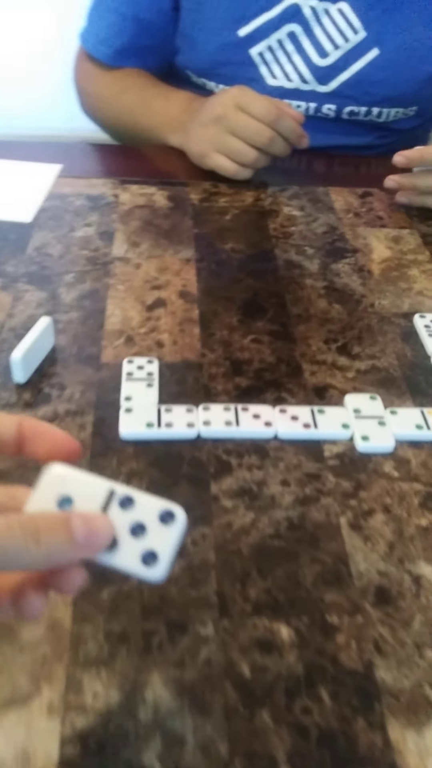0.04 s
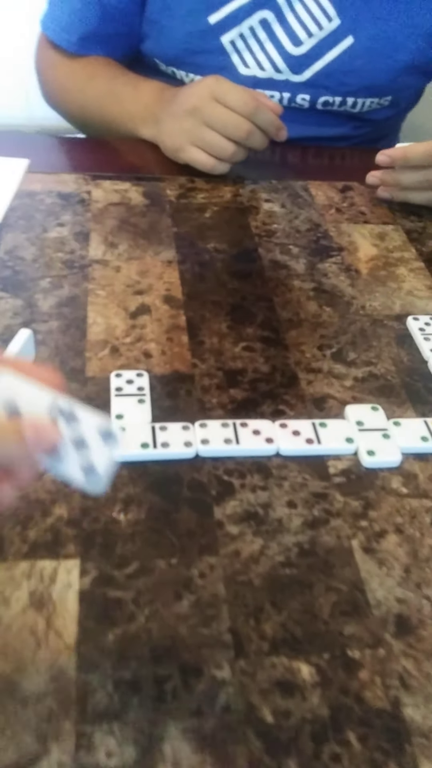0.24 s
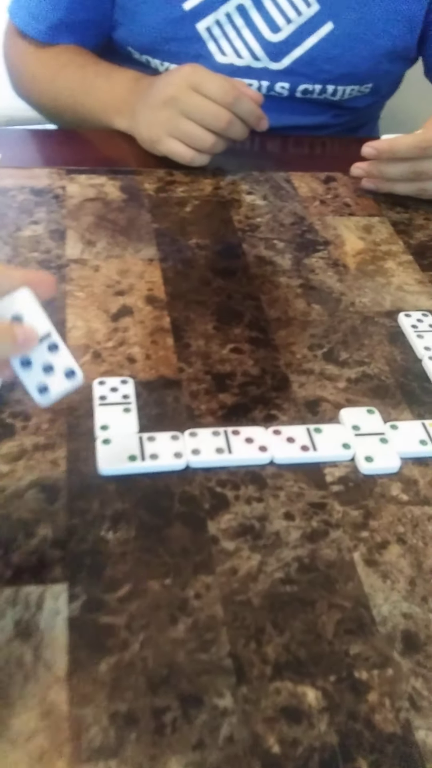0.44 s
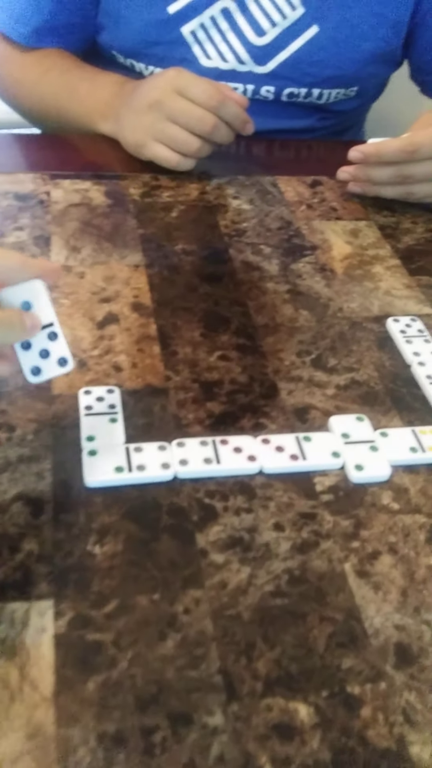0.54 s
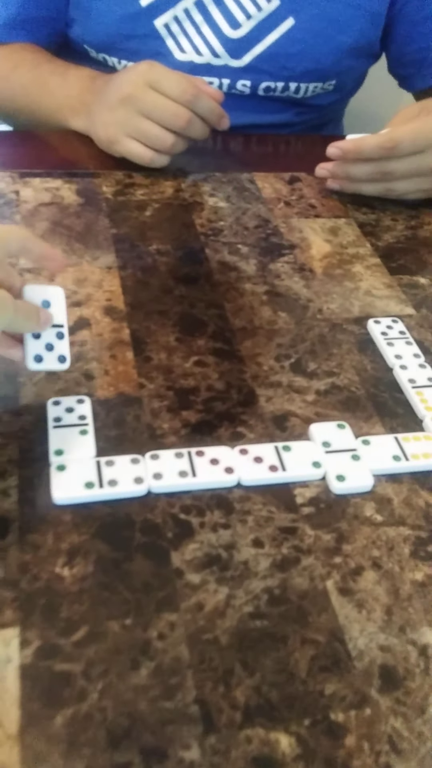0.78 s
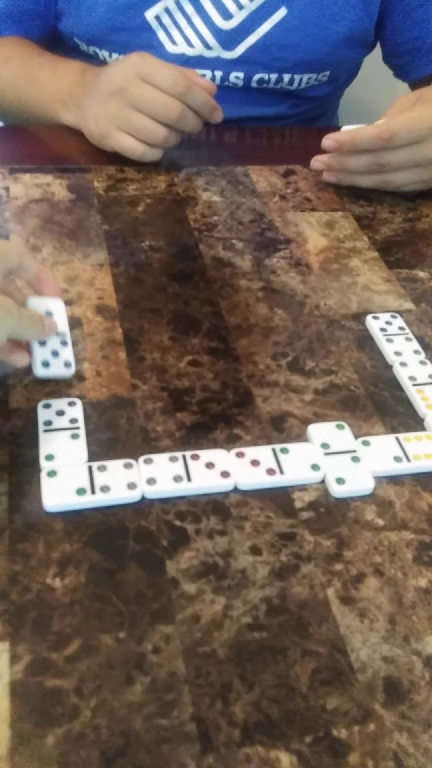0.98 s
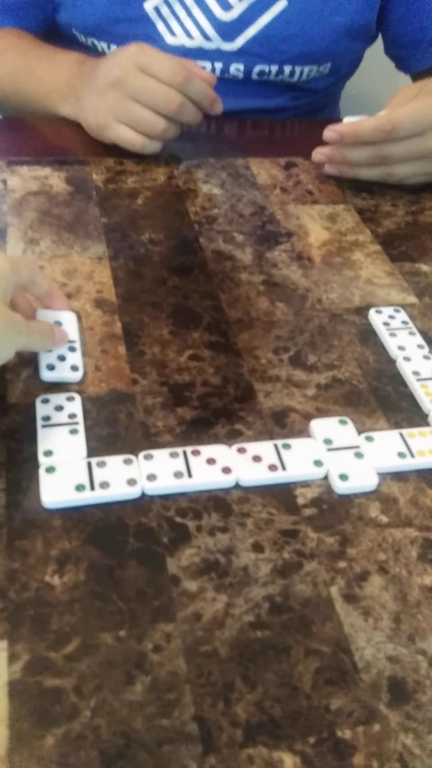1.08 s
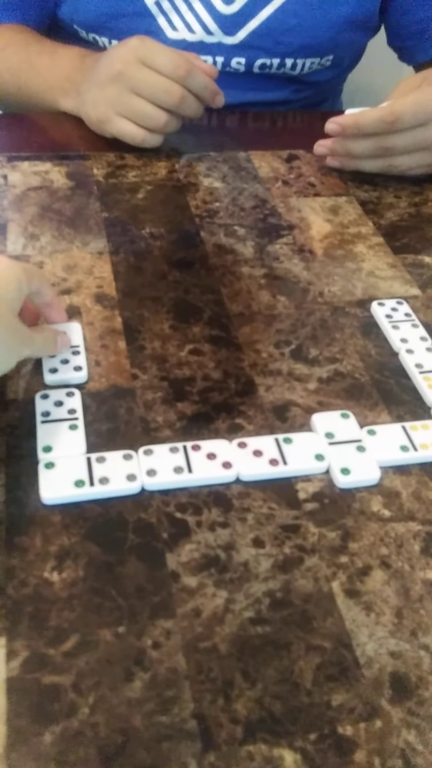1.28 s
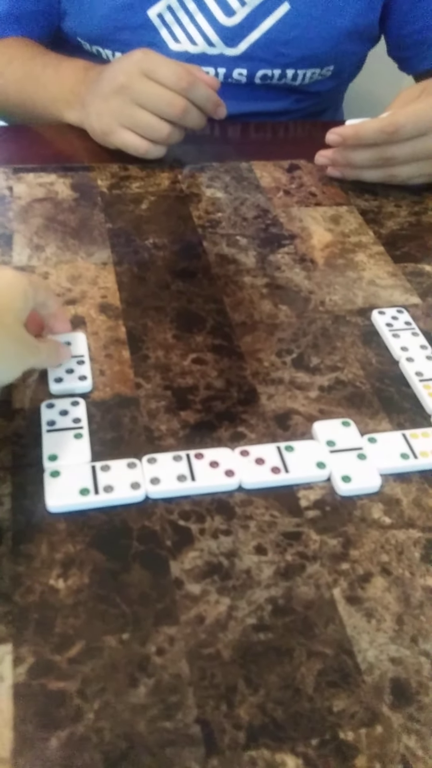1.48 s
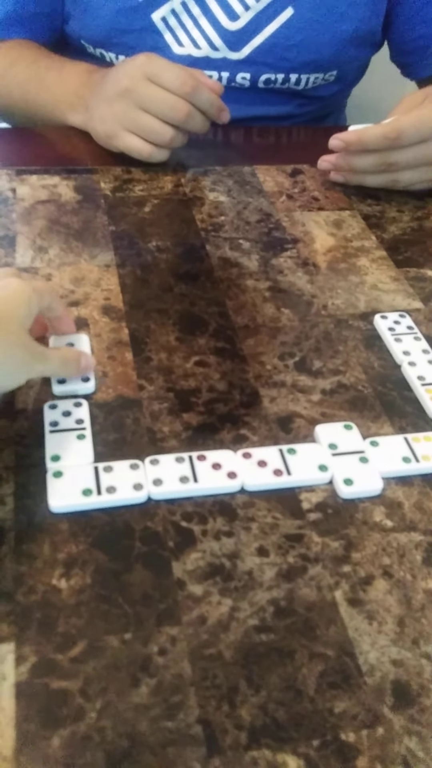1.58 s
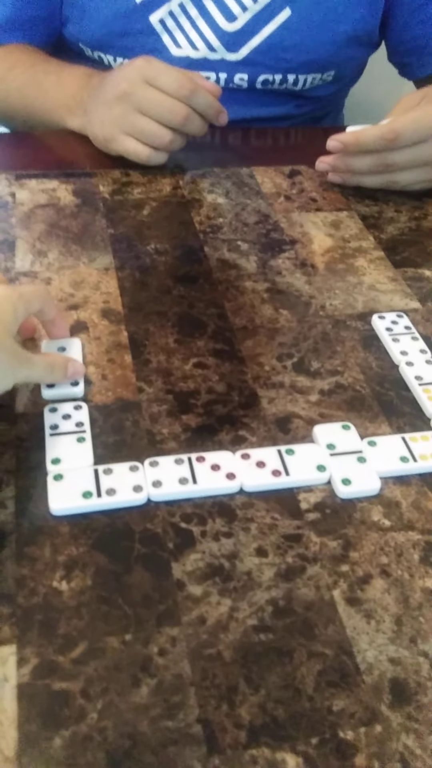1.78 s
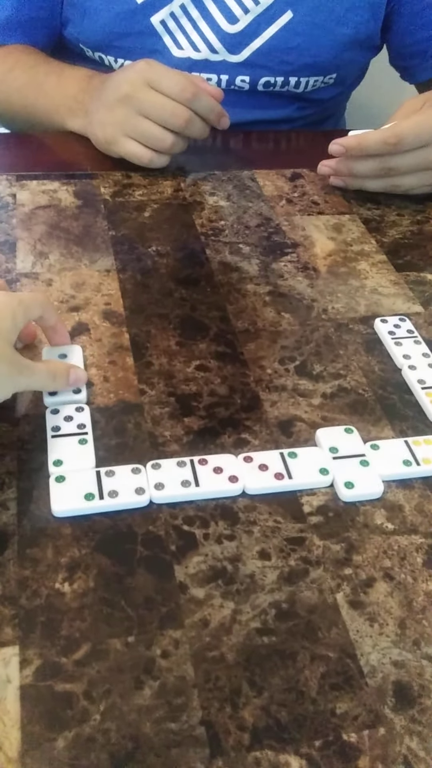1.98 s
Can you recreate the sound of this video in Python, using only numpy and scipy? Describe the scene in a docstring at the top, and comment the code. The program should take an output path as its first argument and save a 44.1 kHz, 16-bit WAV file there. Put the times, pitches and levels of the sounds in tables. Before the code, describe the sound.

A domino is placed on a hard laminate table, heard close in a small live room. Quiet fan air, faint wavering whines and soft fading hiss fill the first second. At 1.06 its edge chatters down; at 1.19 the face slaps with a loud bright crack; at 1.30 it knocks crisply, then bumps dully by 1.34. Brief ringing fades; hiss rises slightly near 2.0.

```python
"""In a small, live room, a domino is played on a laminate table close to the microphone.
Its edge touches down and chatters, its face is slapped flat, it knocks once more, then bumps dully to rest.
Each contact is a click, a bright crack, ringing of the board and tabletop, and a noise tail for the room.
Behind it are steady fan air, faint wavering whines, microphone noise, and a soft hiss.
The hiss is shaped noise that mostly fades, then rises at the very end."""
import sys
import numpy as np
from scipy import signal
from scipy.fft import rfft, irfft
from scipy.io import wavfile
from scipy.ndimage import uniform_filter1d, minimum_filter1d

SR = 44100
rng = np.random.default_rng(int(sys.argv[2]) if len(sys.argv) > 2 else 0)


def pcm_store(signal):
    """Save signal as 16-bit PCM."""
    levels = np.round(np.clip(np.atleast_2d(signal), -1, 1) * 32767)
    wavfile.write(sys.argv[1], SR, levels.astype(np.int16).T)


N = 89875


def amp(db):
    """Turn decibels into a gain."""
    return 10 ** (np.asarray(db) / 20)


def unit(x):
    """Scale to an average (rms) level of 1."""
    return x / np.sqrt(np.mean(x ** 2) + 1e-20)


def energy_one(x):
    """Scale to a total energy of 1."""
    return x / np.linalg.norm(x)


def fade(t, t60):
    """Die away by 60 dB in t60 seconds."""
    return 1000. ** (-t / t60)


def along(points, hz):
    """Read values between (pitch, value) points, on a log pitch axis."""
    point_hz, value = np.transpose(points)
    return np.interp(np.log(hz + 1), np.log(point_hz + 1), value)


def noise(points):
    """Shape random noise to a colour, at rms 1."""
    spectrum = rfft(rng.standard_normal(N))
    gain = amp(along(points, np.fft.rfftfreq(N, 1 / SR)))
    return unit(irfft(spectrum * gain, N))


def pulse(points, size=4096):
    """Make a click of energy 1 with the given colour, its energy packed at the start (minimum phase)."""
    gain = amp(along(points, np.fft.rfftfreq(size, 1 / SR)))
    cepstrum = irfft(np.log(gain))
    # folding the second half away leaves no sound before the click
    cepstrum[1:size // 2] *= 2
    cepstrum[size // 2:] = 0
    return energy_one(irfft(np.exp(rfft(cepstrum))))


def domino():
    """Add up the four blows: edge down, face slapped flat, last knock, and bump to rest."""
    return touch_down() + slap() + knock() + bump()


# contacts of the tile as its edge touches down: start_s, level_db
TOUCH_CONTACTS = [(1.0586, -9), (1.0600, -2.5), (1.0650, -4), (1.0716, -5), (1.0757, -5.5)]
# colour of the touch: pitch_hz, level_db
TOUCH_COLOUR = [(40, -40), (140, -45), (270, -11.5), (450, -12), (750, -9), (1150, 0), (1750, -2.5),
                (2850, -1.5), (3300, -12.5), (4000, -7.5), (4650, -23.5), (6300, -14), (7400, -26.5),
                (9000, -22), (10500, -45), (15000, -45)]


def touch_down():
    """The edge lands and chatters in a few quick contacts."""
    return blow(TOUCH_CONTACTS, TOUCH_COLOUR,
                click_db=-2.5, crack_db=8.5, board_db=1.5, modes_db=-6.5, room_db=-4.5)


# contacts of the slap, a corner first, the face, then rebounds: start_s, level_db
SLAP_CONTACTS = [(1.1862, -16.5), (1.1918, 8.5), (1.1952, -3), (1.2000, -4.5), (1.2045, 2.5), (1.2213, -6)]
# colour of the slap: pitch_hz, level_db
SLAP_COLOUR = [(40, -36.5), (140, -27.5), (310, -15), (560, -18), (800, -11), (1350, -3), (1800, -5),
               (2650, 2.5), (3400, -5), (4200, -1), (5200, -2.5), (6900, -2), (8300, -10), (10300, -21.5),
               (13000, -25), (16000, -30)]


def slap():
    """The face hits flat, the loudest blow, and stirs the room most."""
    return blow(SLAP_CONTACTS, SLAP_COLOUR,
                click_db=-2.5, crack_db=13.5, board_db=6.5, modes_db=-0.5, room_db=7)


# contacts of the settling knock: start_s, level_db
KNOCK_CONTACTS = [(1.2958, -1.5), (1.2972, -1), (1.3002, -7.5)]
# colour of the knock: pitch_hz, level_db
KNOCK_COLOUR = [(40, -28.5), (140, -30), (250, -9.5), (560, -10), (850, -1.5), (1500, 2.5), (2100, 1),
                (2800, -2.5), (3400, -1.5), (4200, -0.5), (5000, -9.5), (6300, -7), (8300, -26),
                (10500, -31.5), (15000, -52)]


def knock():
    """The tile knocks as it settles, with a strong click and little tabletop ring."""
    return blow(KNOCK_CONTACTS, KNOCK_COLOUR,
                click_db=7, crack_db=13, board_db=1.5, modes_db=-10.5, room_db=2.5)


# contacts as the tile comes to rest under the fingers: start_s, level_db
BUMP_CONTACTS = [(1.3235, -10), (1.3440, -11.5)]
# colour of the bump: pitch_hz, level_db
BUMP_COLOUR = [(40, -45), (130, -34.5), (230, -2.5), (550, -1.5), (850, 6), (1700, 1), (2800, 4.5),
               (4500, -13.5), (9000, -32), (15000, -44.5)]


def bump():
    """The tile comes to rest under the fingers, dull because its crack is weak."""
    return blow(BUMP_CONTACTS, BUMP_COLOUR,
                click_db=-1.5, crack_db=-14.5, board_db=6.5, modes_db=-3, room_db=2)


def blow(contacts, colour, click_db, crack_db, board_db, modes_db, room_db):
    """Each contact clicks and cracks, rings the board and tabletop, and stirs the room."""
    t = np.arange(SR) / SR
    out = np.zeros(N + SR)
    click = tile_click(t)
    modes = tabletop(t)
    hardest_db = max(level_db for _, level_db in contacts)
    for start_s, level_db in contacts:
        crack = bright_crack(t)
        board = board_ring(t)
        force = amp(level_db - hardest_db)  # softer contacts crack less
        direct = amp(click_db) * click + force * amp(crack_db) * crack
        direct += amp(board_db) * board + amp(modes_db) * modes
        sound = direct + amp(room_db) * room_tail(t)
        out[round(start_s * SR):][:SR] += amp(level_db) * sound
    return signal.fftconvolve(out[:N], pulse(colour))[:N]


TILE_HZ, TILE_T60_S, TILE_DB = 2840, 0.0036, -1.5  # the tile's own short clack


def tile_click(t):
    """A sharp impulse starts the tile ringing at one pitch for a few milliseconds."""
    ring = np.sin(2 * np.pi * TILE_HZ * t) * fade(t, TILE_T60_S)
    click = amp(TILE_DB) * energy_one(np.gradient(ring))
    click[0] += 1
    return click


CRACK_HZ, CRACK_T60_S = 10900, 0.0061  # low edge of the crack's treble, and its decay time


def bright_crack(t):
    """The snap of a contact is a very short burst of noise, filtered to its treble."""
    treble = signal.butter(2, CRACK_HZ, "high", fs=SR)
    burst = rng.standard_normal(SR) * fade(t, CRACK_T60_S)
    return energy_one(signal.lfilter(*treble, burst))


def board_ring(t):
    """The board's many close resonances blur together, so fading noise stands in for them."""
    board_t60_s = 0.078
    return energy_one(rng.standard_normal(SR) * fade(t, board_t60_s))


# ringing tones of the tabletop: pitch_hz, level_db (against each other), t60_s
TABLETOP_MODES = [(250, -21.5, .6), (313, -4, .2), (477, -10.5, 0.35), (594, -10.5, .16), (853, -10, .16),
                  (1085, -6.5, .15), (1163, -10, .16), (1408, -3.5, .1), (1928, -9.5, 0.23),
                  (2233, -5.5, .14), (2536, -3, 0.22), (2722, -4, .22), (2884, -7.5, .2), (2990, 0, .11),
                  (3702, -8, 0.16), (3996, -5, .2), (4186, -7, .22), (4340, -7, .22), (7900, -9.5, .3)]


def tabletop(t):
    """The tabletop rings at its own pitches, each a sine that dies at its own pace."""
    ring = np.zeros(len(t))
    for k, (pitch_hz, level_db, t60_s) in enumerate(TABLETOP_MODES):
        sign = (-1) ** k  # every other tone starts downwards
        ring += sign * amp(level_db) * fade(t, t60_s) * np.sin(2 * np.pi * pitch_hz * t)
    return energy_one(ring)


# how long the room rings: pitch_hz, t60_s
ROOM_DECAY = [(60, .1), (130, .2), (240, 0.58), (700, 0.38), (1500, 0.39), (2700, 0.42), (5000, 0.42),
              (7500, 0.38), (11000, .28), (16000, 0.18)]
ROOM_DELAY_S, ROOM_BUILD_S = 0.0028, 0.0037  # wait before the room answers, and its build-up time


def room_tail(t, size=256):
    """The room's echoes blur into noise that builds up briefly, then fades at a pace set by pitch."""
    pitch_hz, time_s, bands = signal.stft(rng.standard_normal(len(t)), SR, nperseg=size)
    faded = bands * fade(time_s, along(ROOM_DECAY, pitch_hz)[:, None])
    tail = signal.istft(faded, SR, nperseg=size)[1][:len(t)]
    build = 1 - np.exp(-np.maximum(t - ROOM_DELAY_S, 0) / ROOM_BUILD_S)
    return energy_one(tail * build)


# whining tones of the fan: pitch_hz, level_db (rms)
WHINE_LINES = [(1136, -79.5), (1255.5, -70.5), (1374, -80.5), (1496, -76.5)]


def fan_whine():
    """The fan whines on a few steady tones whose pitches waver slowly and separately."""
    waver_hz = 1.4  # rms
    whine = np.zeros(N)
    for pitch_hz, level_db in WHINE_LINES:
        # slow noise: mostly below about 10 Hz
        waver = noise([(8, -4), (60, -46), (400, -120)])
        phase = 2 * np.pi * np.cumsum(pitch_hz + waver_hz * waver) / SR
        whine += amp(level_db) * np.sqrt(2) * np.sin(phase)
    return whine


# colour of the fan and room air: pitch_hz, level_db
AIR_COLOUR = [(30, -43.5), (120, -35), (200, -22.5), (250, -9), (325, -1.5), (500, -10), (820, -6),
              (1020, -9.5), (1260, -6.5), (1550, -11), (1800, -22.5), (2400, -28.5), (4000, -60.5)]


def fan_air():
    """Moving air from the fan and room is steady, mostly low noise."""
    air_db = -67  # rms
    return amp(air_db) * noise(AIR_COLOUR)


# colour of the hiss: pitch_hz, level_db
HISS_COLOUR = [(1000, -22.5), (2000, 0), (3200, -4.5), (5500, 1), (7500, -3), (10500, -14.5),
               (15500, -17.5)]
# loudness of the hiss over time: time_s, level_db
HISS_LEVEL = [(0, -67.5), (.15, -66.5), (.5, -67), (.8, -69.5), (1.05, -74.5), (1.7, -77), (1.97, -77.5),
              (2.04, -71)]


def soft_hiss():
    """Bright noise follows a loudness curve: it mostly fades, then rises at the very end."""
    t = np.arange(N) / SR
    level_db = np.interp(t, *np.transpose(HISS_LEVEL))
    return amp(level_db) * noise(HISS_COLOUR)


# colour of the microphone's own noise: pitch_hz, level_db
MIC_COLOUR = [(100, -15.5), (1500, 11.5), (2500, 9.5), (4000, -1), (15500, -3.5)]


def microphone_noise():
    """The microphone adds its own steady noise."""
    mic_db = -70  # rms
    return amp(mic_db) * noise(MIC_COLOUR)


def background():
    """Add up the fan, the hiss and the microphone's own noise."""
    return fan_whine() + fan_air() + soft_hiss() + microphone_noise()


def scene():
    """Play the domino over the quiet room, as one channel."""
    return (domino() + background())[None]


CEILING, LIMIT_HOLD_S = 0.69, 0.0014  # peak level where limiting starts, and the limiter's window
TOP_HZ = 16100  # upper band limit


def record(dry):
    """A fast limiter turns the peaks down, then a steep filter removes the highest treble."""
    size = max(int(LIMIT_HOLD_S * SR), 1)
    needed_gain = CEILING / np.maximum(abs(dry), CEILING)
    gain = uniform_filter1d(minimum_filter1d(needed_gain, size), size)
    band_limit = 1 + (np.fft.rfftfreq(N, 1 / SR) / TOP_HZ) ** 200
    return irfft(rfft(dry * gain) / band_limit, N)


dry = scene()
out = record(dry)
pcm_store(out)
```